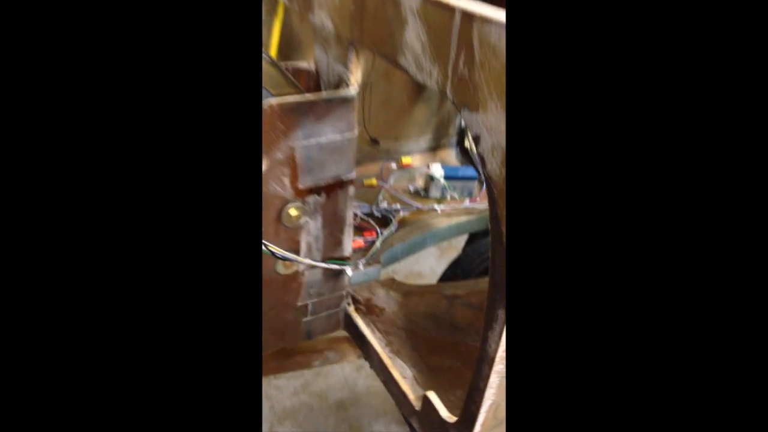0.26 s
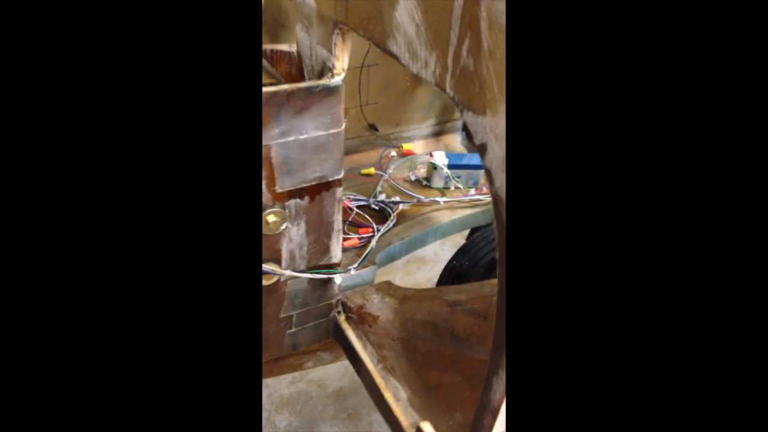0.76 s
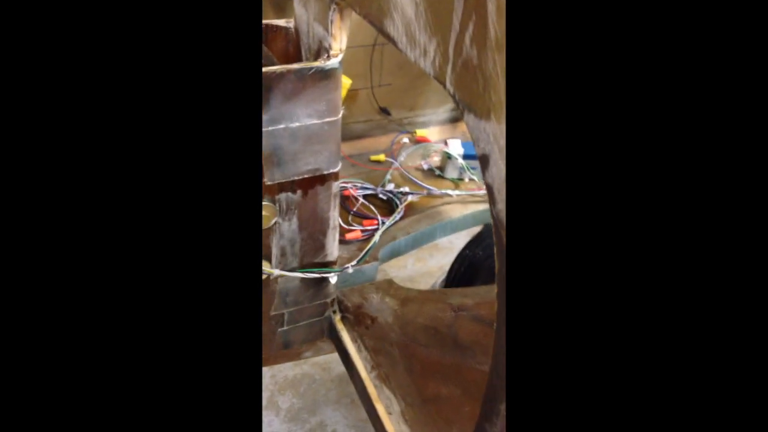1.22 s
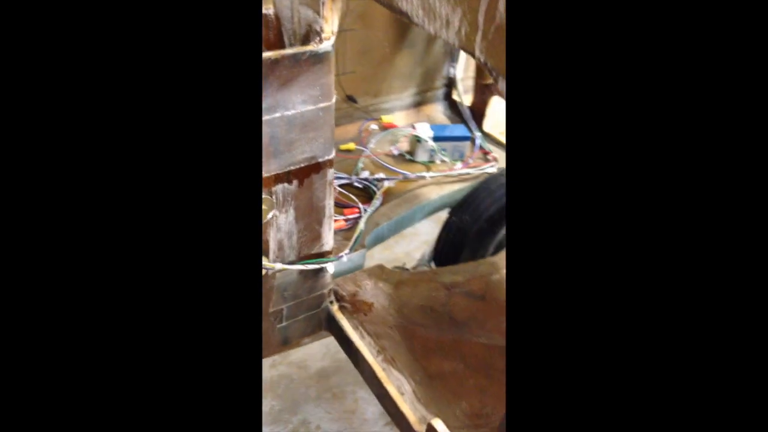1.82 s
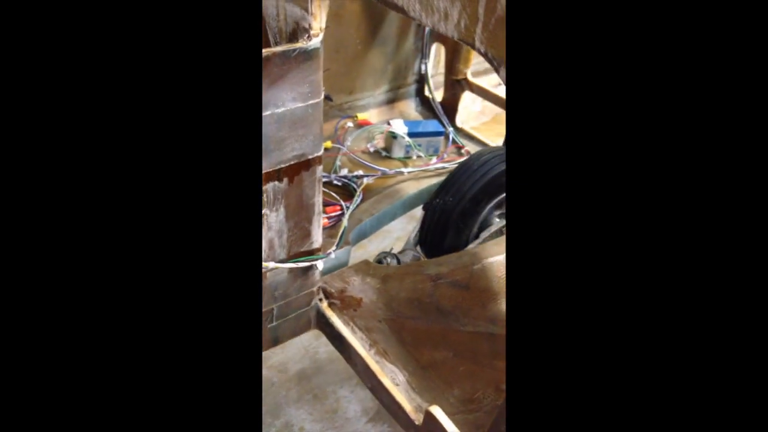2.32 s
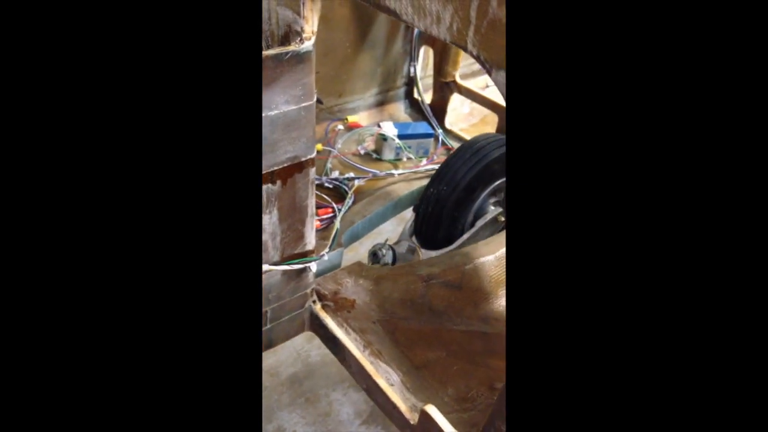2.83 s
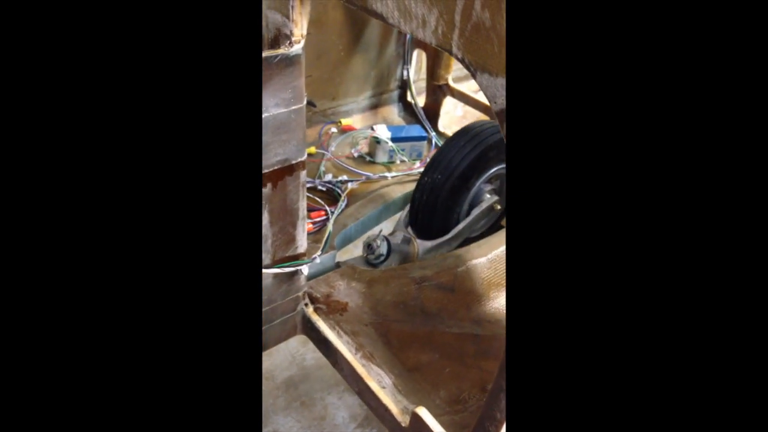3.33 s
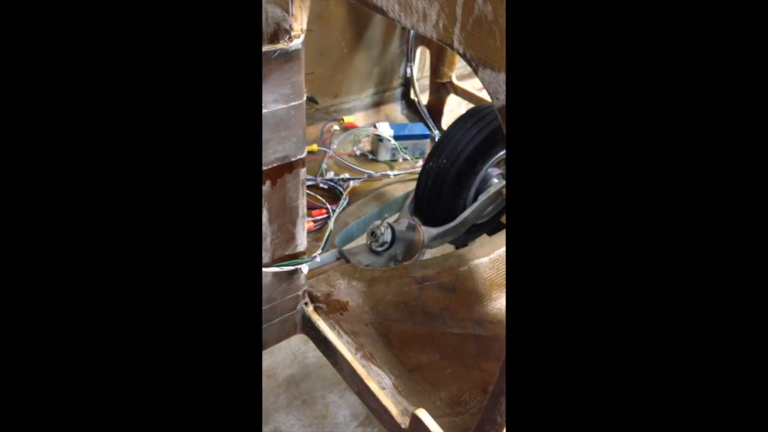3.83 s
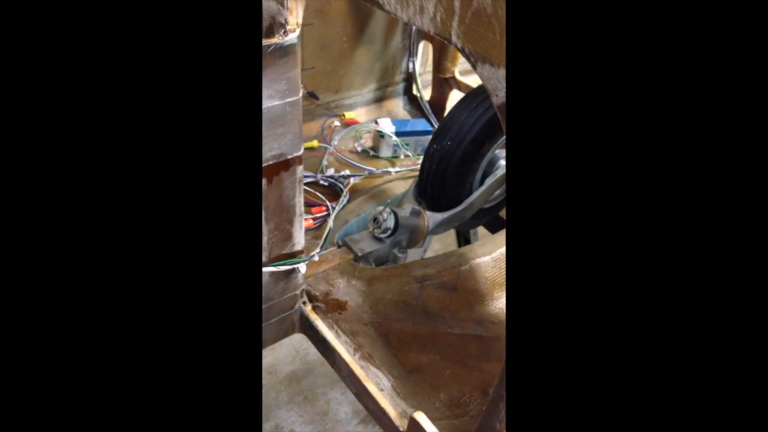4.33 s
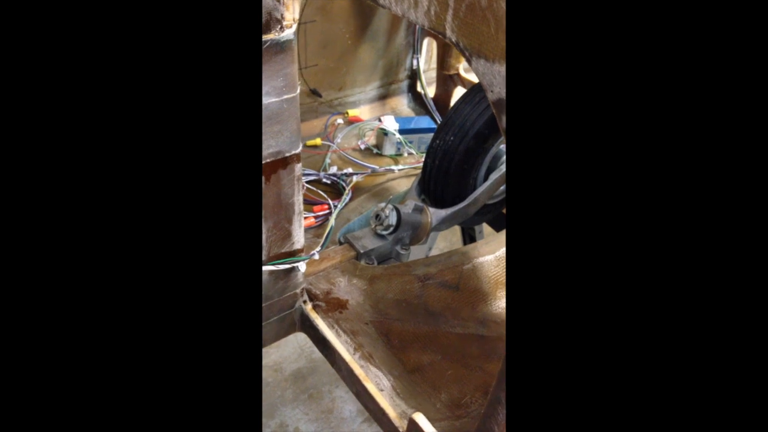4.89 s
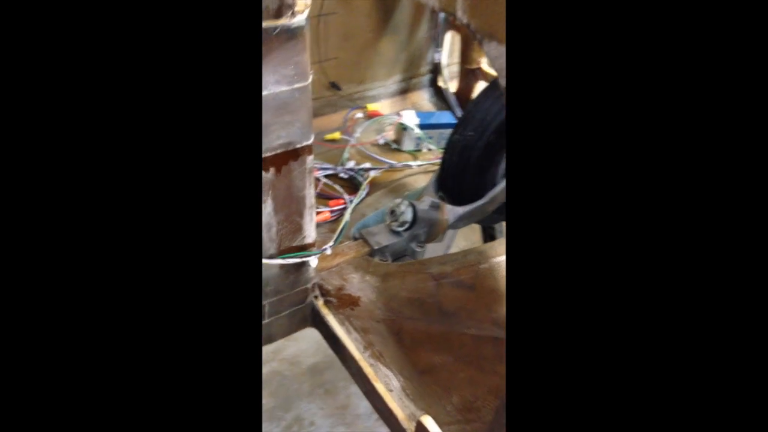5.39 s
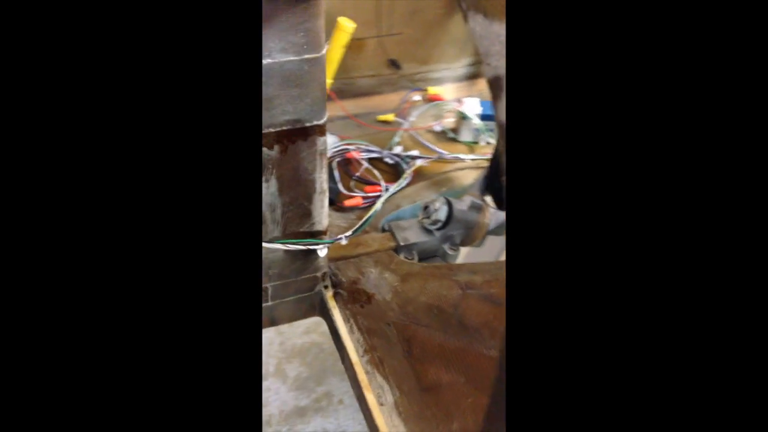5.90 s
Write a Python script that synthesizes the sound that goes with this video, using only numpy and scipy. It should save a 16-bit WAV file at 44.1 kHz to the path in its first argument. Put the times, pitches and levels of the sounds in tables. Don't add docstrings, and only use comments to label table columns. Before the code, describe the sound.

Close, mono pickup inside a wooden hull: an actuator hauls up a wheel strut with a steady buzzing whine, rough and throbbing, alternately biting and easing. The pitch barely sags as the loaded tone gradually weakens. Then the strut bumps its end stop, several quick bounces ring the hull and boards rattle, and the motor dies at once. A short room echo gives way to faint murmuring air, handling ticks and a sleeve brush.

```python
import sys
import numpy as np
from scipy import signal
from scipy.fft import rfft, irfft, next_fast_len
from scipy.io import wavfile
from scipy.ndimage import uniform_filter1d

SR = 44100
rng = np.random.default_rng(int(sys.argv[2]) if len(sys.argv) > 2 else 0)


def put_to_file(sound):
    columns = np.atleast_2d(sound).T
    safe = np.clip(columns, -1, 1)
    whole_steps = np.round(safe * 32767)
    wavfile.write(sys.argv[1], SR, whole_steps.astype(np.int16))


def to_linear_factor(level_db):
    exponent = np.asarray(level_db, float) / 20
    return 10 ** exponent


N = 271215
T = np.arange(N) / SR


def rms_one(x):
    return x / np.sqrt(np.mean(x ** 2) + 1e-20)


def in_time(rows):
    s, *columns = np.transpose(rows)
    return [np.interp(T, s, column) for column in columns]


def plateau(at_s, half_s):
    out = np.zeros(N)
    near = slice(*np.searchsorted(T, [at_s - 2 * half_s, at_s + 2 * half_s]))
    out[near] = np.exp(-np.square(np.square((T[near] - at_s) / half_s)))
    return out


def drift(hz):
    r = np.exp(-40 * np.pi * hz / SR)
    slow = signal.lfilter([1], [1, -2 * r, r * r], rng.standard_normal(N // 20 + 3002))[3000:]
    return np.interp(np.arange(N) / 20, np.arange(len(slow)), rms_one(slow))


def band_pass(x, low_hz, high_hz, steepness):
    return signal.sosfilt(signal.butter(steepness, [low_hz, high_hz], "band", fs=SR, output="sos"), x)


def high_pass(x, hz):
    return signal.sosfilt(signal.butter(2, hz, "high", fs=SR, output="sos"), x)


def colour(x, spectrum, peaks=()):
    size = next_fast_len(N)
    hz = np.arange(1, size // 2 + 2) * SR / size
    spectrum_hz, spectrum_db = np.transpose(spectrum)
    db = np.interp(np.log(hz), np.log(spectrum_hz), spectrum_db)
    for centre_hz, width_hz, peak_db in peaks:
        db = db + peak_db / (1 + (2 * (hz - centre_hz) / width_hz) ** 2)
    return rms_one(irfft(rfft(x, size) * to_linear_factor(db), size)[:N])


def ring(at_s, hz, t60, soft_hz):
    r, w, soft = to_linear_factor(-60 / (t60 * SR)), 2 * np.pi * hz / SR, np.exp(-2 * np.pi * soft_hz / SR)
    click = np.full(N, 1e-18)
    click[round(at_s * SR)] = 1
    blow = signal.lfilter([1 - soft], [1, -soft], click)
    return signal.lfilter([0, np.sin(w)], [1, -2 * r * np.cos(w), r * r], blow)


# bite_s, bite_db, ease_after_s, eased_db, slack_db
BITES = [
    (-.145, -18, 0.16, -24, -27),
    (0.52, -19.5, 0.25, -23, -29.5),
    (1.162, -20, 0.23, -28.5, -29.5),
    (1.79, -20.5, 0.23, -26.5, -32.5),
    (2.438, -21.5, 0.22, -28, -33.5),
    (3.089, -22, 0.2, -28.5, -32),
    (3.738, -22, 0.18, -29.5, -34.5),
    (4.378, -24, .2, -32, -33),
]
WHEEL_TURN_S = .642
TAKE_UP_S, HOLD_SHARE = 0.03, 0.52
REBITE_S, REBITE_LOSS_DB = 0.048, 0.5
LET_GO_S, LET_GO_LOSS_DB = 0.3394, 3.0
DROP_S, BACKLASH_DB, SETTLE_S = 0.0286, 5.0, 0.033


def mesh_level():
    corners, slack_before = [], BITES[0][4]
    for s, bite_db, ease_s, eased_db, slack_db in BITES:
        eased, let_go = s + ease_s, s + LET_GO_S
        rebite, dropped = eased + REBITE_S, let_go + DROP_S
        corners += [(s - TAKE_UP_S, slack_before - BACKLASH_DB / 2),
                    (s, bite_db),
                    (s + HOLD_SHARE * ease_s, bite_db - REBITE_LOSS_DB),
                    (eased, eased_db),
                    (rebite, bite_db - REBITE_LOSS_DB),
                    (max(let_go, rebite + .005), bite_db - LET_GO_LOSS_DB),
                    (dropped, slack_db - BACKLASH_DB),
                    (dropped + SETTLE_S, slack_db),
                    (s + WHEEL_TURN_S - 2 * TAKE_UP_S, slack_db)]
        slack_before = slack_db
    return in_time(corners)[0]


# time_s, level_db
NEAR = [(0.0, 0.5), (.4, 0), (.6, -4), (.8, 0.5), (1.25, -0.5), (1.8, 3.5), (2.1, 2), (2.7, -1.5),
        (3.15, -2), (3.7, 0), (4.4, 0.5)]
FACING_S, FACING_HALF_S = 1.36, 0.54
SHAFT_HZ, SAG_HZ_PER_S, SWING_HZ = 91.65, .14, .3
STALL_S, COAST_S = 4.43, .07
LAY_RATIO, LAY_PHASES = 8.5, (.12, .63, .16)
KNOCK_TURN, KNOCK_FADE_TURNS, KNOCK, KNOCK_FACING = .22, .12, .4, 1.8
GAP_TURN, GAP_TURNS = .53, .06
SECOND_TURN, SECOND_FADE_TURNS = .68, .14


def high_tooth(lay_turns, at_turn, fade_turns):
    return uniform_filter1d(np.exp(-((lay_turns - at_turn) % 1) / fade_turns), size=160)


def gear_train():
    coast_db = -20 / np.log(10) * np.clip(T - STALL_S, 0, 1) / COAST_S
    swing = np.cos(2 * np.pi * (T - BITES[1][0] - LET_GO_S) / WHEEL_TURN_S)
    turns = np.cumsum((SHAFT_HZ - SAG_HZ_PER_S * T + SWING_HZ * swing) * to_linear_factor(coast_db)) / SR
    mesh_db, near_db = mesh_level(), in_time(NEAR)[0]
    facing = np.exp(-.5 * ((T - FACING_S) / FACING_HALF_S) ** 2)
    lay_turns = turns / LAY_RATIO
    lay = [np.cos(2 * np.pi * (k * lay_turns - phase)) for k, phase in zip((1, 2, 3), LAY_PHASES)]
    knock = KNOCK + KNOCK_FACING * plateau(FACING_S + 0.089, 0.62)
    throb = 0.75 * lay[0] + 0.44 * lay[1] + 0.36 * lay[2]
    throb += knock * high_tooth(lay_turns, KNOCK_TURN, KNOCK_FADE_TURNS)
    from_gap = (lay_turns - GAP_TURN + .5) % 1 - .5
    gap = np.exp(-.5 * (from_gap / (GAP_TURNS * np.clip(T / 2.3, 1, 1.6))) ** 2)
    shaft = turns + 0.0013 * np.sin(2 * np.pi * (lay_turns - .08)) + 0.00085 * drift(22.0)
    return dict(coast_db=coast_db, turns=turns, shaft=shaft, lay_turns=lay_turns, lay=lay,
                mesh_db=mesh_db, load_db=uniform_filter1d(mesh_db, size=1200) + 24.5,
                facing=facing, whine_db=near_db - 31, hiss_db=near_db - 44.5 + 0.5 * facing,
                throb=throb, gap=gap, second=high_tooth(lay_turns, SECOND_TURN, SECOND_FADE_TURNS),
                wobble=[drift(28.5) for _ in range(6)])


# multiple, centre_s,
# half_length_s, gain_db
ORDER_SPELLS = [(10, 0.539, 0.012, 3.5), (10, 0.14, 0.089, -1), (10, 1.24, 0.032, 1), (10, 1.36, 0.028, 2),
                (10, 1.97, 0.031, -1.5), (10, 2.4, 0.028, 2.5), (10, 2.37, 0.038, -5),
                (10, 0.29, 0.046, -2), (10, .9, 0.022, -4), (10, 3.27, .015, -1), (10, 3.35, 0.016, 3.5),
                (10, 3.91, 0.012, -8), (10, 3.8, 0.011, 4), (10, 4.33, .025, -4), (10, 3.06, 0.023, 0),
                (10, 4.385, 0.014, 2), (6, 0.375, 0.051, 5), (6, 0.615, 0.11, -9), (6, 0.805, .08, 6),
                (6, 1.03, .07, 4.5), (6, 1.27, 0.056, -7), (6, 1.44, 0.05, 7.5), (6, 1.91, .1, -8),
                (6, 2.54, 0.094, -13), (6, 2.77, 0.13, 1.5), (6, 2.41, 0.08, -1), (6, 3.13, 0.075, -9),
                (6, 3.79, 0.06, -8), (4, 0.1, 0.064, 3), (4, 0.54, 0.12, -3), (4, 1.38, 0.038, 7.5),
                (4, 3.55, .05, -8), (4, 3.82, 0.053, -9), (8, .62, .05, 7), (8, 1.235, 0.074, 7.5),
                (8, 1.86, .08, 3), (8, 2.5, .05, 6.5), (8, 3.79, 0.027, 5), (11, 0.22, 0.17, 4.5),
                (11, .76, 0.034, 9), (11, 2.03, .08, 8.5), (11, 2.73, 0.083, 6.5), (40, .03, 0.065, 5),
                (40, 0.35, 0.27, -7), (40, .9, 0.2, -2), (40, 1.63, 0.39, -8), (40, 2.72, 0.077, 6),
                (40, 3.65, 0.13, 3), (60, 1.2, 0.18, 10.5),
                (16, 0.056, .07, -4), (16, .4, 0.15, 6), (16, .8, .1, 3.5), (16, 1.214, .04, -10),
                (16, 2.54, 0.088, 2.5), (16, 3.05, 0.21, 3), (16, 3.45, 0.073, 1.5), (20, 0.615, .03, 7),
                (20, 0.91, 0.093, 2), (20, 1.1, 0.023, 9), (20, 1.51, .03, -13), (20, 2.204, .06, 2.5),
                (20, 3.2, 0.071, -4), (20, 3.43, 0.014, -12), (20, 3.66, 0.026, 3), (24, 0.046, .02, 9),
                (24, 0.14, .025, 16.5), (24, 0.304, .06, 7), (24, .65, .04, -8), (24, 0.83, 0.086, 3),
                (24, 1.45, .04, 5), (24, 3.8, 0.032, 4), (24, 4.2, .15, 1), (30, .02, .04, 8.5),
                (30, 1.04, .03, 8.5), (30, 1.36, .02, 6), (30, 1.42, 0.056, 8), (30, 1.74, 0.026, 7),
                (30, 2.07, .06, 5.5), (30, 2.3, .03, 6), (30, 3.86, 0.036, -13), (30, 4.38, 0.044, 7.5),
                (41, 1.57, 0.28, 20), (50, 0.57, 0.034, -7), (50, 1.42, 0.033, 3), (70, 1.4, .08, 7),
                (16, 0.61, 0.074, 3.5), (16, 1.07, .06, 3), (20, 1.6, .025, -9), (30, .52, 0.064, -7),
                (30, 1.305, 0.016, -14), (30, 0.98, .04, -4), (30, 3.55, .09, 3), (30, 3.27, .02, -10),
                (40, 1.5, .09, -5), (40, 2.05, 0.068, 3.5), (40, 0.27, .06, -5), (50, 1.83, 0.18, -3),
                (50, 4, 0.55, -3.5),
                (10, 2.52, .01, -1), (10, 2.6, 0.011, -1), (10, 3.127, 0.0072, -2), (10, 3.17, 0.0068, -3),
           (10, 3.222, 0.0073, -3), (10, 3.38, .012, -2), (10, 3.777, 0.011, -5), (10, 3.828, 0.0074, -5),
           (10, 3.875, 0.0091, -5), (10, 3.94, .015, -2), (10, 4.06, 0.026, 0), (10, 4.405, .012, -0.5),
           (20, 5.1, 0.054, -2), (20, 5.1, 0.0087, -6), (30, 3.32, .015, 5), (30, 3.78, .04, 3),
           (30, 4.17, 0.042, 5), (30, .81, .02, 6), (30, 1.25, .04, 2), (10, 4.3, .02, -4),
           (10, 2.82, .02, 4.5), (10, 2.16, 0.014, 7), (10, 4.13, .015, -3), (6, 3.6, .12, -1.5),
           (6, .3, .012, -12), (6, 3.46, .012, -12), (4, .21, 0.014, -9), (4, .4, .015, -8),
           (4, 1.43, 0.014, -16), (4, 1.685, .05, 4), (4, 3.15, .04, -4), (4, 3.92, 0.054, 3),
           (10, 1.793, .012, -1), (11, 4.1, .1, 3.5), (11, 1.58, 0.13, 3), (30, 1, .007, -10),
           (30, 1.1, .006, -8), (30, 1.1, .01, 6), (30, 1.265, 0.018, 3), (30, 1.42, .02, -7),
           (24, 1.445, 0.016, 4.5), (24, 4.0, .1, -5), (60, 1.14, .02, 7), (60, 1.225, .022, 4),
           (60, 1.28, .02, -10), (50, 1.285, .02, -8), (30, 4.32, 0.025, 4), (50, 4.4, 0.0092, -2),
                (20, 1.58, .035, 5), (20, .5, .03, 3), (40, .73, .025, 4), (40, .83, .02, 4),
                 (40, .78, .02, -5), (40, .1, .02, -4), (50, .16, .012, 4), (50, .25, .012, 4),
                 (50, .44, .012, 4), (50, .12, .02, -4), (50, .3, .02, -3), (30, .22, .015, -5),
                 (30, 2.5, .05, 3), (10, 2.085, .02, 2), (16, .45, .05, -3)]
TOOTH_SWEEP, STRAY = -0.109, 0.19


def order(gear, multiple, db, rough_db, shake, bend=0, family=None):
    k, start = multiple, rng.random()
    if family:
        k = family
        start = TOOTH_SWEEP * (multiple - 10 * family) ** 2 + (STRAY if family == 5 else 1) * start
    for m, s, half_s, gain_db in ORDER_SPELLS:
        if round(m) == multiple:
            db = db + gain_db * plateau(s, half_s)
    wobble = gear["wobble"]
    phase = 2 * np.pi * (multiple * gear["shaft"] + start) + shake * wobble[k % 5] + bend
    height_db = db + 1.4 * rough_db * np.tanh(wobble[(k + 3) % 6])
    return np.sqrt(2) * to_linear_factor(height_db) * np.sin(phase)


# centre_s, half_length_s, loss_db
OCTAVE_NULLS = [
    (0.0, 0.055, -7.5),
    (0.536, 0.54, 10),
    (1.255, 0.24, 16),
    (1.625, 0.15, 5),
    (2.195, 0.14, 4),
    (2.85, 0.12, 4),
    (3.312, 0.24, 4),
]
# centre_s, half_length_s, gain_db
THIRD_SPELLS = [(.05, 0.061, 2), (0.256, 0.046, 15), (0.644, 0.041, 10.5), (.9, 0.13, 7.5),
                (1.194, 0.11, 13), (1.496, 0.18, 6.5), (1.924, 0.17, 7.5), (2.487, 0.07, 10.5),
                (2.598, 0.02, 9), (3.23, 0.018, 12), (3.316, 0.021, 10), (3.8, 0.11, 8), (3.963, 0.058, 13),
                (4.275, 0.27, 5.5)]


def mesh_tones(gear):
    lay, load_db = gear["lay"], gear["load_db"]
    release = np.cumsum(np.clip(-np.gradient(load_db) - 120 / SR, 0, None))
    slack = np.clip(-load_db, 0, 12)
    tones = order(gear, 10, gear["mesh_db"] + (0.7 + 0.61 * T) * np.roll(lay[1], 215),
                  rough_db=0.67 + 0.12 * slack, shake=0.21 + 0.025 * slack,
                  bend=0.85 * release - 0.024 * load_db + 0.11 * drift(61.0))
    fade = uniform_filter1d(((gear["lay_turns"] - .95) % 1) ** 3, size=300)
    octave_db = -28.5 + 1.5 - sum(loss_db * plateau(s, half_s) for s, half_s, loss_db in OCTAVE_NULLS)
    octave_db += 3.0 * lay[1] * plateau(.6, .9) - 8.0 * np.clip(T / 5.2, .3, 1) * fade
    tones += order(gear, 20, octave_db, rough_db=2.5, shake=0.34, bend=0.12 * drift(67.0))
    third_db = -52.0 + sum(gain_db * plateau(s, half_s) for s, half_s, gain_db in THIRD_SPELLS)
    tones += order(gear, 30, third_db + 1.3 * lay[0] + 2.1 * lay[1], rough_db=3.5, shake=0.47)
    stray_db = -50 - 2.0 * T + 10.7 * plateau(1.29, 0.51) + 3.5 * lay[0]
    return tones + order(gear, 24, stray_db, rough_db=2.0, shake=0.3)


# multiple, level_db, gain_per_load (dB per dB), throb_db, stroke_gain_db
LOW_ORDERS = [(2, -59.5, 0, 0.5, 12.5), (3, -55.5, 0, -0.5, 10.5), (4, -43, 0.17, 1.5, -0.5),
              (5, -50, 0.4, 3, 5), (6, -41.5, -0.44, 3.5, 2), (7, -52, 1, -3.5, 2.5),
              (8, -50.5, 0.8, 8, -0.5), (9, -56.5, -1, 0.5, -5), (11, -41.5, 0.16, 2, 1.5),
              (12, -61.5, -0.5, -6, 5), (13, -51, 0.3, 2.2, 5), (14, -61.5, 0.2, 8, 18),
              (15, -52.5, 0, -3.5, 3), (16, -43, -0.15, 3, 5), (17, -66, -1, -11.5, -18),
              (19, -56, -0.3, 9.5, -10), (21, -44.5, 0.22, 5, 0), (22, -53, 0, 4, 2.5),
              (26, -54, 1.83, 3, 7), (28, -60.5, 1.5, -2, 8)]


def low_hum(gear):
    swell = np.cos(2 * np.pi * (gear["lay_turns"] - 0.7))
    load_db = np.clip(gear["load_db"], -7, 7)
    tones = 0
    for multiple, db, follows, throb_db, gained_db in LOW_ORDERS:
        db = db + follows * load_db + throb_db * swell + gained_db * (T / 3.3 - .5)
        tones = tones + order(gear, multiple, db, rough_db=3.0, shake=0.61)
    return tones


# multiple, level_db (over the whine)
HIGH_ORDERS = [(32, -27.5), (34, -25), (36, -21.5), (37, -25), (38, -20), (39, -18), (40, -5.5), (41, -35),
               (42, -29), (44, -22), (46, -19.5), (48, -17), (49, -13.5), (50, -4), (70.6, -23.5),
               (103, -39), (112, -35.5), (51, -12), (52, -20), (54, -17), (56, -20), (60, -23)]


def upper_whine(gear):
    gap = gear["gap"]
    db = gear["whine_db"] + 1.6 * gear["throb"] + 3.8 * gear["second"]
    db -= 7.0 * np.clip(T / 4.5, .4, 1.6) * gap
    db -= 22.0 * np.clip((T - STALL_S) / .02, 0, 1)
    late_gap_db = 5.8 * np.clip(T - 2.6, 0, 1) * gap
    bend = 0.31 * np.sin(2 * np.pi * (gear["lay_turns"] - .1))
    tones = 0
    for multiple, over_db in HIGH_ORDERS:
        tones = tones + order(gear, round(multiple), over_db + db - (multiple == 40) * late_gap_db,
                              rough_db=1.5, shake=0.37, bend=bend, family=round(multiple / 10))
    return tones


# delay_s, height
ECHOES = [(.0013, 0.59), (.0037, 0.46), (.0082, 0.31)]


def panels(x):
    late = [height * np.interp(T - delay_s * (1 + 0.031 * drift(0.382)), T, x) for delay_s, height in ECHOES]
    return rms_one(x + sum(late))


# pitch_hz, level_db (per Hz)
HOUSING = [(110, -28), (200, -17.5), (500, -6.5), (900, -11), (1400, -10), (2200, -16.5), (3000, -14.5),
           (4500, -13), (6000, -18), (8000, -28), (11000, -41.5), (13000, -49), (16000, -64)]
# pitch_hz, width_hz, level_db
HOUSING_PEAKS = [(1573, 126, -27.5), (785, 68, -12.5), (3696, 290, 3.5), (4600, 420, 6.5), (5530, 160, -5),
                 (5446, 180, 8.5), (6600, 210, 4), (7440, 210, 2.5), (9020, 310, 3), (10600, 330, 3.5),
                 (2470, 180, -6.5), (3013, 190, -11.5), (5350, 85, -8), (6940, 140, -3.5),
                 (7780, 170, -7.5), (10800, 130, -14), (11600, 110, -10)]


def tooth_noise(gear):
    scrape = [panels(colour(rng.standard_normal(N), HOUSING, HOUSING_PEAKS)) for _ in range(2)]
    whine_db, hiss_db, load_db, facing = [gear[k] for k in ("whine_db", "hiss_db", "load_db", "facing")]
    # low_hz, high_hz, level_db, throb_db, tooth_db (gap and second tooth), motor_swing_db, swing_peak (turns)
    parts = [(138, 493, -35.0 + 0.034 * load_db, -1.0, 3, -1.8, 0),
             (700, 1290, -32.0 + 0.22 * load_db, 3.0, 0.5, 1.8, 0),
             (1460, 3090, 0.3 * whine_db - 20.5, 0.0, -0.5, 1.5, 0.19),
             (3120, 3990, whine_db - 2.5, -2.0, 0.0, 1.0, 0.021),
             (4150, 5700, whine_db - 3.0, 1.5, 2.5, 2.0, .2),
             (5430, 8340, hiss_db + 12.5, 1.5, 2.0, 1.5, 0.38),
             (7840, 11100, hiss_db + 15.5, 1.2 + 1.2 * facing, 5.5, 2.0, 0.29),
             (9310, 9750, -46 + 25 * facing, 4.5, 3.0, 1.0, .36),
             (6270, 6650, -50 + 21 * facing, 5.0, -1.0, 1.0, .4),
             (11050, 14400, .5 * hiss_db - 4.0, 1.0, 3.0, 1.4, .05)]
    noise = 0
    for k, (low_hz, high_hz, db, throb_db, tooth_db, swing_db, at_turn) in enumerate(parts):
        db = db + throb_db * gear["throb"] + tooth_db * (gear["second"] - 0.61 * gear["gap"])
        db = db + swing_db * np.cos(2 * np.pi * (gear["turns"] - at_turn)) + 1.3 * drift(9.0)
        noise = noise + to_linear_factor(db) * band_pass(scrape[k % 2], low_hz, high_hz, 3)
    return noise


def gearbox():
    gear = gear_train()
    coast_db = gear["coast_db"]
    unload_db = 5.5 * np.clip((T - STALL_S) / 0.035, 0, 1)
    tones = mesh_tones(gear) + low_hum(gear) + upper_whine(gear)
    return to_linear_factor(2.3 * coast_db - unload_db) * tones, to_linear_factor(2.45 * coast_db) * tooth_noise(gear)


def room(x):
    t60_s, level_db = 0.4, -14.5
    t = np.arange(int(.6 * SR)) / SR
    tail = rng.standard_normal(len(t)) * to_linear_factor(-60 * t / t60_s) * (t > .006)
    tail = signal.lfilter([.3], [1, -.7], tail)
    return to_linear_factor(level_db) * signal.fftconvolve(x, tail / np.sqrt(np.sum(tail ** 2)))[:N]


# pitch_hz, level_db (per Hz)
SHOP = [(15, -64), (27, -41), (79, -14.5), (193, -5.5), (378, -16), (456, -13.5), (781, -23.5),
        (943, -20.5), (1490, -26), (2170, -29), (3080, -32), (13500, -45), (15500, -54)]


def shop_air():
    air = colour(rng.standard_normal(N), SHOP)
    low = signal.sosfiltfilt(signal.butter(2, 350, fs=SR, output="sos"), air)
    murmur = to_linear_factor(-45.5 + 1.7 * drift(16.0) + 0.87 * drift(2.0)) * low
    return murmur + to_linear_factor(np.interp(T, [4.8, 6.1], [-48, -45.5])) * (air - low)


# centre_s, half_length_s, level_db, pitch_hz
SLEEVE = [
    (.28, 0.055, -49, 10800),
    (0.872, 0.028, -45.5, 11800),
    (4.432, .012, -50, 12400),
    (5.4, 0.14, -61, 3000),
    (5.635, 0.053, -49.5, 3320),
    (5.74, 0.13, -60.5, 3000),
    (6.14, .05, -62, 4500),
]


def sleeve():
    out = 0
    for s, half_s, db, hz in SLEEVE:
        cloth = rms_one(band_pass(rng.standard_normal(N), 0.37 * hz, 1.58 * hz, 2))
        grain = cloth * to_linear_factor(3.1 * np.tanh(drift(110.0)))
        out = out + to_linear_factor(db) * np.exp(-.5 * ((T - s) / half_s) ** 2) * grain
    return out


# start_s, level_db,
# pitch_hz, cycles_to_die
TICKS = [(5.9, -46, 270, 16.0), (3.03, -27.5, 180, 16.0), (5.439, -32, 700, 13), (5.438, -37, 3800, 14.0),
         (5.603, -41, 4950, 70.0), (5.613, -40, 3550, 50.0), (5.633, -42, 4900, 60.0),
         (5.655, -40, 2450, 35.0), (5.8, -36, 190, 8.0), (5.657, -44, 4500, 60.0), (5.645, -36, 205, 14.0),
         (5.66, -35, 200, 10.0), (5.6, -38, 194, 15), (6.072, -31.5, 190, 8.0)]


def ticks():
    return sum(to_linear_factor(db) * ring(s, hz, cycles / hz, soft_hz=6000) for s, db, hz, cycles in TICKS)


# start_s, level_db, hardness_hz
STOP_BLOWS = [
    (4.434, -19.5, 400),
    (4.444, -23, 1500),
    (4.445, -25, 2530),
    (4.451, -21.5, 2450),
    (4.47, -24, 1195),
    (4.485, -30.5, 900),
    (4.511, -33, 450),
    (4.55, -43, 587),
]
# pitch_hz, level_db, t60_s
HULL = [(371, -1, .17), (463, -7, .14), (560, -9, .12), (660, -6, .1), (760, -4, .07), (1060, -9, .07),
        (1290, 7, .06), (1420, -1, .06)]


def hull_blows():
    out = 0
    chances = rng.normal(0, 2.8, (len(STOP_BLOWS), len(HULL)))
    for (s, db, hard_hz), chance in zip(STOP_BLOWS, chances):
        for k, (hz, mode_db, t60) in enumerate(HULL):
            out = out + (-1) ** k * to_linear_factor(db + mode_db + chance[k]) * ring(s, hz, t60, hard_hz)
    return out


def loose_boards():
    start_s, level_db, t60_s = 4.438, -29.5, 0.42
    boards = rms_one(band_pass(rng.standard_normal(N), 300, 1350, 3))
    db = level_db - 60 * np.abs(T - start_s) / t60_s + 1.2 * drift(51.0)
    return boards * to_linear_factor(db) * np.clip((T - start_s) / 0.0063, 0, 1)


def end_stop():
    return high_pass(hull_blows() + loose_boards(), 220)


def scene():
    tones, noise = gearbox()
    motor = tones + noise + room(noise + 0.59 * tones)
    return (motor + shop_air() + sleeve() + ticks() + end_stop())[None]


def band_limit(x):
    return signal.sosfilt(signal.butter(12, 15610, fs=SR, output="sos"), x)


def record(dry):
    heard = high_pass(dry, 86)
    heard = 0.62 * np.tanh(heard / 0.62)
    return band_limit(heard)


dry = scene()
out = record(dry)
put_to_file(out)
```